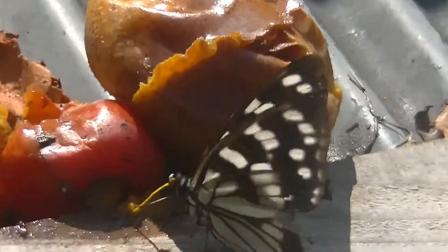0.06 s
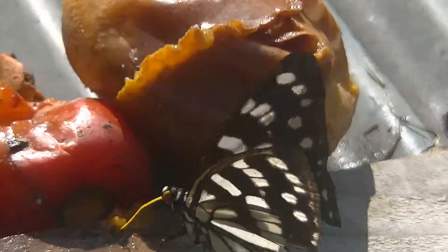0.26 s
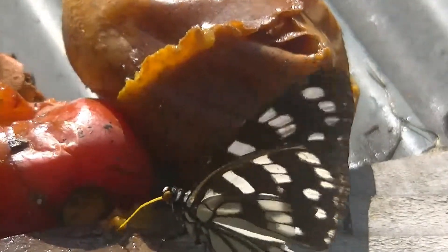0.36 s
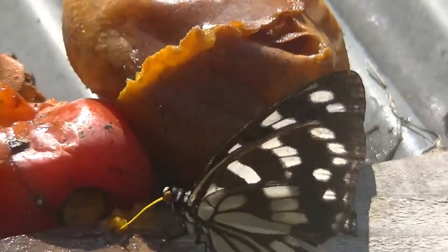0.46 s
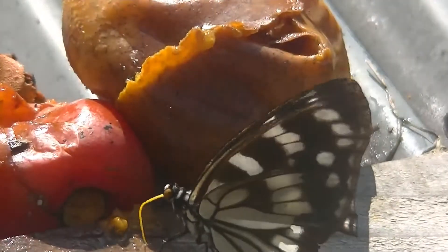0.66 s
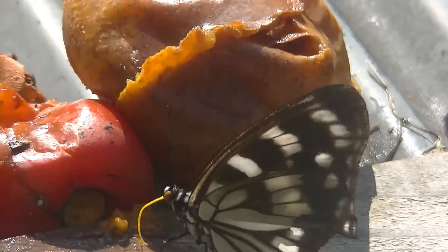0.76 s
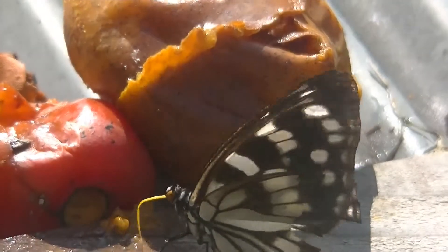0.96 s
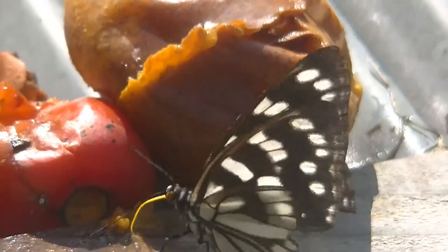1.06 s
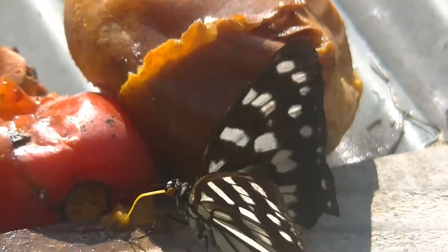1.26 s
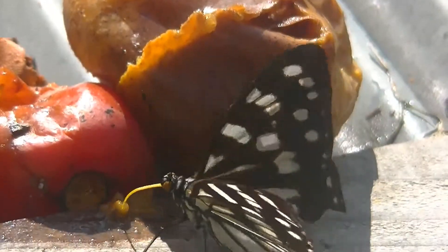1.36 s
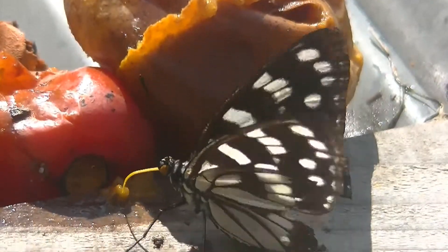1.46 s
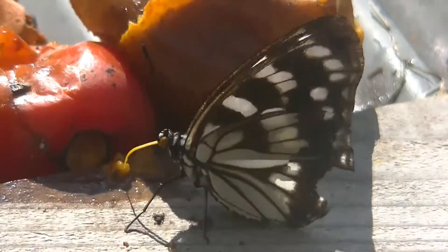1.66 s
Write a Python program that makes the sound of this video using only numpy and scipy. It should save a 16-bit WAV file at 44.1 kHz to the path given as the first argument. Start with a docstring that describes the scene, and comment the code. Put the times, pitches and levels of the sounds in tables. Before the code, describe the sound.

A small plastic device is handled close by, outdoors. A sharp click comes at about 0.2 seconds, followed by a brief rub and a dull tap at 0.3. Soft bumps and scuffs surround a hollow knock near 0.9 seconds. A faint hiss, hum and tiny ticks run throughout, with two very faint, distant chirps around 0.4 and 1.3 seconds.

```python
"""A steady hiss, a faint hum and tiny ticks, then a sharp click, a duller tap and later a hollow knock.
It is probably a hand working a small plastic device close by, outdoors; its mechanism hums and ticks.
Each hit makes the plastic ring with a few fading tones and a short rattle of noise. Soft bumps, a rub
and scuffs come in between. Two thin chirps rise far off, and the highest hiss swells twice."""
import sys
import numpy as np
from scipy import signal
from scipy.fft import rfft, irfft
from scipy.io import wavfile

SR = 44100
rng = np.random.default_rng(int(sys.argv[2]) if len(sys.argv) > 2 else 0)


def waveform_to_disk(signal):
    """Save audio, clipped to [-1, 1], as 16-bit WAV at the path in sys.argv[1]."""
    frames = np.transpose(np.atleast_2d(signal))
    scaled = np.clip(frames, -1, 1) * 32767
    samples = np.round(scaled).astype(np.int16)
    wavfile.write(sys.argv[1], SR, samples)


N = 74970
T = np.arange(N) / SR


def from_db(db):
    """Turn decibels into a number to multiply by."""
    return 10 ** (np.asarray(db) / 20)


def pan(db):
    """Left and right gains that make the left side louder by db."""
    return from_db(np.array([[db], [-db]]) / 2)


def level(rows):
    """A gain that glides between (time [s], level [dB]) points."""
    return from_db(np.interp(T, *np.transpose(rows)))


def cut(sound, order, hz, kind):
    """Filter a sound, keeping its "low", "high" or "band" part."""
    return signal.sosfilt(signal.butter(order, hz, kind, fs=SR, output="sos"), sound)


def noise(colour, alike):
    """Stereo noise of a given colour (level at each pitch); alike=1 makes both sides the same."""
    alike_above_hz = 4270  # higher up, both sides of the microphone hear nearly the same
    hz, db = np.transpose(colour)
    bins = np.fft.rfftfreq(N, 1 / SR) + 1
    gain = from_db(np.interp(np.log(bins), np.log(hz), db))
    gains = np.array([gain, gain / (1 + (bins / alike_above_hz) ** 2)])
    mid, side = irfft(rfft(rng.standard_normal((2, N))) * gains, N)
    out = np.sqrt(1 + alike) * mid + np.sqrt(1 - alike) * np.array([side, -side])
    return out / out.std()


def drift(rate_hz):
    """A smooth random wobble, about 1 in size."""
    slow = cut(rng.standard_normal(2 * N), 2, rate_hz, "low")[N:]
    return slow / slow.std()


def ring(hits, tones, rise_s, lag_s, late_s):
    """Each hit starts tones that drop 60 dB in their fade time; low ones come later, the right lags."""
    body, lowest_hz = 0, tones[0][0]
    for k, (hz, db, fade_s, left_db) in enumerate(tones):
        delay = late_s * (lowest_hz / hz) ** 2 + np.array([[0], [lag_s]])
        age = np.maximum(T[:SR // 4] - delay, 0)
        shape = (1 - np.exp(-age / rise_s)) * np.exp(-np.log(1000) * age / fade_s)
        body = body + (-1) ** k * pan(left_db) * from_db(db) * shape * np.sin(2 * np.pi * hz * age)
    blows = np.zeros((1, N))
    for s, db in hits:
        blows[0, int(s * SR)] += from_db(db)
    return signal.fftconvolve(blows, body, axes=1)[:, :N]


def rattle(hits, colour, rise_s, fall_s, tail_db, tail_s, alike):
    """Countless tiny vibrations blur into noise after each hit: a quick burst and a weak, longer tail."""
    power = 0
    for s, db in hits:
        age = np.maximum(T - s, 0)
        fade = np.exp(-age / fall_s) + from_db(tail_db) * np.exp(-age / tail_s)
        shape = (1 - np.exp(-age / rise_s)) * fade
        power = power + (from_db(db) * shape) ** 2
    return np.sqrt(power) * noise(colour, alike)


def background():
    """An even hiss in the middle and a low rustle toward the left."""
    # colours of the two noises: (pitch [Hz], level [dB])
    hiss_colour = [(200, -23), (800, -5), (1500, -5), (2400, 1), (3300, -2), (4700, -1.5), (6800, -3.5),
                   (8200, -1.5), (8900, 4), (9700, -8.5), (15500, -12)]
    rustle_colour = [(25, -2), (65, 1), (110, -12.5), (170, -7), (260, -5.5), (350, -0.5), (480, -11),
                     (800, -14), (1500, -24)]
    # the rustle's rise and fall: (time [s], level [dB])
    loudness = [(0, -54.5), (.25, -51.5), (.4, -58.5), (.6, -58.5), (.85, -52), (1.05, -59.5), (1.7, -58.5)]
    hiss = cut(noise(hiss_colour, alike=0.17), 2, 180, "high")
    rustle = cut(noise(rustle_colour, alike=0.1), 2, 1800, "low")
    return from_db(-60) * hiss + level(loudness) * rustle * pan(4.6)


def hum():
    """The mechanism's faint, wavering tone, joined for a moment by a rough, sinking whirr."""
    # the whirr's path: (time [s], pitch [Hz], level [dB])
    path = [(.5, 345, -76), (0.571, 333.7, -54), (.62, 317.9, -60), (.68, 309, -59), (.74, 297.3, -64.5),
            (.78, 293, -84)]
    s, hz, db = np.transpose(path)
    hum_gain = from_db(-65.5 + 1.05 * drift(18))
    hum_hz = 352 + 3 * drift(16.8)
    whirr_gain = from_db(np.interp(T, s, db) + 5.1 * drift(61))
    whirr_hz = np.interp(T, s, hz) + 11 * drift(50)
    steady = hum_gain * np.sin(2 * np.pi * np.cumsum(hum_hz) / SR)
    whirr = whirr_gain * np.sin(2 * np.pi * np.cumsum(whirr_hz) / SR)
    return steady * pan(15.6) + whirr * pan(10.4)


def ticks():
    """The mechanism's faint, regular ticks, with a few louder ones standing out."""
    # the louder ticks, then the regular steps' rise and fall: (time [s], level [dB])
    loud_ticks = [(.1105, 5), (.124, -1.5), (.779, -2), (.7895, 2), (.860, -0.5), (.979, -2.5),
                  (1.409, -5.5), (1.479, 0), (1.579, -4), (1.676, -5)]
    step_loudness = [(0, -8), (.4, -9), (.6, -6), (.85, -4.5), (1.05, -21), (1.3, -10), (1.7, -11.5)]
    # each tick's ring: (pitch [Hz], level [dB], fade time [s], left over right [dB])
    tones = [(195, -55.5, 0.054, -1), (412, -53.5, 0.064, 15), (669, -56, 0.09, 4),
             (907, -53.5, 0.026, -18), (1304, -50, 0.016, -21), (2700, -48, 0.014, -2)]
    # its rattle: (pitch [Hz], level [dB])
    colour = [(80, -15), (190, -5.5), (900, 0), (1700, -10.5), (2600, -8.5), (4500, -36)]
    steps_per_s, spread_db = 30, 4
    times = np.arange(.008, T[-1], 1 / steps_per_s)
    step_db = np.interp(times, *np.transpose(step_loudness)) + spread_db * rng.standard_normal(len(times))
    hits = list(loud_ticks) + list(zip(times, step_db))
    body = ring(hits, tones, rise_s=0.0025, lag_s=0.00036, late_s=.002)
    burst = rattle(hits, colour, rise_s=0.0011, fall_s=0.0051, tail_db=-15, tail_s=0.0096, alike=0.051)
    return body + from_db(-46) * pan(2.0) * burst


def bumps():
    """Soft, low thuds as the grip shifts."""
    # thuds: (time [s], level [dB])
    hits = [(.118, -6.5), (.273, -1), (.34, -11), (.791, 0.5), (.799, -3.5), (.862, -4.5), (.925, -1),
            (.941, -6.5), (1.674, -12)]
    # their ring: (pitch [Hz], level [dB], fade time [s], left over right [dB])
    tones = [(179, -40, 0.086, 6), (217, -44.5, 0.049, 6), (302, -49, 0.018, 14), (392, -37.5, 0.052, 15.5)]
    return ring(hits, tones, rise_s=0.003, lag_s=0.00079, late_s=0.0027)


def clicks():
    """Small, stiff plastic snaps through: a sharp crack inside a very short ring."""
    # snaps: (time [s], level [dB])
    hits = [(0.2313, 0.5), (0.2518, -26)]
    # their ring: (pitch [Hz], level [dB], fade time [s], left over right [dB])
    tones = [(1230, -26, 0.021, -5), (1641, -20.5, 0.013, 11), (1988, -25.5, 0.01, 4),
             (2750, -21, 0.016, 13), (3207, -13.5, .011, -10), (4130, -12, 0.015, -5.5),
             (5490, -20, 0.013, 0)]
    # their rattle: (pitch [Hz], level [dB])
    colour = [(100, -30), (750, -18), (1300, -4.5), (3400, 1), (5500, -10), (8500, -18.5), (10500, -35),
              (16000, -35)]
    snaps = np.zeros(N)
    for s, db in hits:
        snaps[int((s + .0005) * SR)] = from_db(db + 3)  # the instant the plastic gives way
    crack = cut(snaps + 1e-18, 2, [2800, 6100], "band")
    body = ring(hits, tones, rise_s=0.00065, lag_s=.00002, late_s=0.002007)
    burst = rattle(hits, colour, rise_s=0.00039, fall_s=0.0018, tail_db=-20.5, tail_s=0.0059, alike=-0.42)
    return crack + cut(body + from_db(-14) * burst, 1, 600, "high")


def rub():
    """Surfaces slide with a brief hiss between the click and the tap."""
    # the rub's rise and fall: (time [s], level [dB])
    loudness = [(.24, -59), (.255, -58), (.268, -54.5), (.282, -47), (.3, -47.5), (.322, -52), (.35, -68)]
    # its hiss: (pitch [Hz], level [dB])
    colour = [(500, -0.5), (1300, -2.5), (2500, -3), (4300, -0.5), (6000, -9.5), (8000, -17.5),
              (15000, -28)]
    return level(loudness) * noise(colour, alike=0.17) * pan(-1.1)


def taps():
    """A short, dull contact, heavier on the left."""
    # taps: (time [s], level [dB])
    hits = [(.3052, 0), (.3372, -21.5)]
    # their ring: (pitch [Hz], level [dB], fade time [s], left over right [dB])
    tones = [(181, -40, 0.13, 5), (325, -15.5, 0.0247, 7), (397.3, -17.5, 0.042, 10), (645, -32, 0.048, 14),
             (817, -27.5, 0.021, 2), (1408, -22, .022, 9), (1620, -15.5, 0.019, 2), (3650, -43, 0.066, -10)]
    # their rattle: (pitch [Hz], level [dB])
    colour = [(60, -22), (180, -7.5), (700, 3), (1000, -5.5), (1500, 1), (2400, -7.5), (4000, -5.5),
              (7000, -20), (15000, -38)]
    body = ring(hits, tones, rise_s=0.0022, lag_s=0.000825, late_s=0.0033)
    burst = rattle(hits, colour, rise_s=0.00019, fall_s=0.0031, tail_db=-21.5, tail_s=0.026, alike=0.06)
    return body + from_db(-27.5) * pan(0.83) * burst


def chirps():
    """Thin, raspy whistles that bend upward, perhaps a distant bird."""
    # chirps: (time [s], length [s], start pitch [Hz], end pitch [Hz], level [dB])
    calls = [(0.414, 0.099, 2146, 2860, -59.5), (1.289, 0.14, 1880, 2443, -61)]
    # their rasp: (pitch [Hz], level [dB])
    colour = [(1200, -21), (2200, 2), (3100, -3), (4000, -2), (6500, -3), (9000, -25)]
    rasp = from_db(-0.5) * noise(colour, alike=0.23)
    out = 0
    for s, length, start_hz, end_hz, db in calls:
        progress = np.clip((T - s) / length, 0, 1)
        glide_hz = start_hz + (end_hz - start_hz) * progress ** 1.7  # climbs ever faster
        phase = 2 * np.pi * np.cumsum(glide_hz * (1 + 0.0338 * drift(384))) / SR
        whistle = np.sin(phase) + from_db(-2.5) * np.sin(2 * phase)
        out = out + from_db(db) * np.sin(np.pi * progress) * (whistle + rasp)
    return out * pan(-1.1)


def swells():
    """Soft swells of very high hiss, perhaps an insect."""
    # swells: (time [s], length [s], level [dB])
    rises = [(0.487, 0.22, -66.5), (1.385, 0.23, -66.5)]
    # their hiss: (pitch [Hz], level [dB])
    colour = [(8000, -34), (11000, -6), (13000, -1), (14300, 3), (16000, -10)]
    gain = sum(from_db(db) * np.sin(np.pi * np.clip((T - s) / length, 0, 1)) for s, length, db in rises)
    return noise(colour, alike=1.0) * gain


def scuffs():
    """Short, gritty scrapes as the knocking surfaces meet."""
    # scrapes: (time [s], level [dB])
    hits = [(.7895, -2.5), (.887, -6), (.9115, -0.5)]
    # their grit: (pitch [Hz], level [dB])
    colour = [(300, -9.5), (1000, 4.5), (1400, 4), (1700, -10), (2050, -2), (2400, -15), (2800, -29),
              (6000, -33)]
    grit = rattle(hits, colour, rise_s=0.0016, fall_s=0.0029, tail_db=-22, tail_s=0.028, alike=.3)
    return from_db(-30) * grit


def knocks():
    """A deeper, hollow contact with a small bounce."""
    # knock and bounce: (time [s], level [dB])
    hits = [(.8943, 1), (.9122, -19.5)]
    # their ring: (pitch [Hz], level [dB], fade time [s], left over right [dB])
    tones = [(156.2, -39.5, 0.093, 4), (208.7, -29.5, 0.072, 10.5), (442, -23, 0.025, 16),
             (614, -21, 0.031, 15.5), (787, -13.5, .018, 6), (1263, -22, 0.016, -1), (1533, -29, 0.0099, 8),
             (2010, -29.5, 0.023, -1), (2410, -37, 0.022, 6), (3990, -37, 0.007, -12)]
    # their rattle: (pitch [Hz], level [dB])
    colour = [(50, -20), (170, -8), (650, 5.5), (1000, -6), (2100, -11), (2900, -38), (4200, -24),
              (9000, -65)]
    body = ring(hits, tones, rise_s=0.00053, lag_s=0.00061, late_s=0.0054)
    burst = rattle(hits, colour, rise_s=0.00049, fall_s=0.004, tail_db=-11.5, tail_s=0.025, alike=-0.13)
    return body + from_db(-27.5) * pan(5.5) * burst


def scene():
    """All the sounds together."""
    device = clicks() + taps() + knocks() + scuffs() + bumps() + ticks() + rub() + hum()
    return device + chirps() + swells() + background()


def record(dry):
    """The microphone thins the bass, and the very highest treble is cut."""
    bass_hz, top_hz = 110, 15900
    thin = cut(dry, 3, bass_hz, "high")
    return signal.sosfilt(signal.ellip(10, .1, 70, top_hz, fs=SR, output="sos"), thin)


dry = scene()
out = record(dry)
waveform_to_disk(out)
```